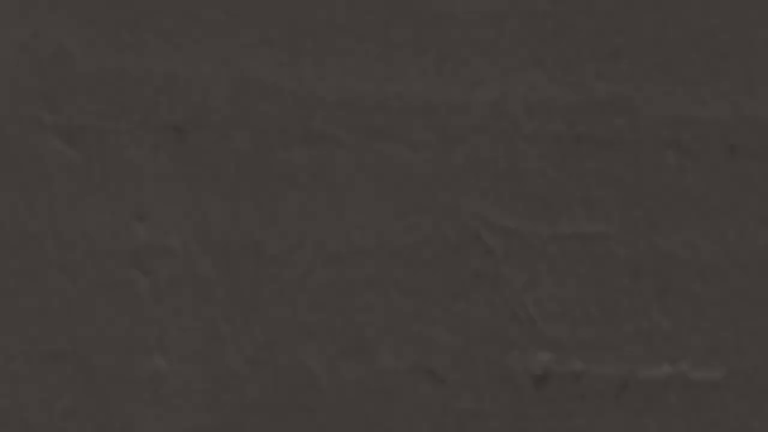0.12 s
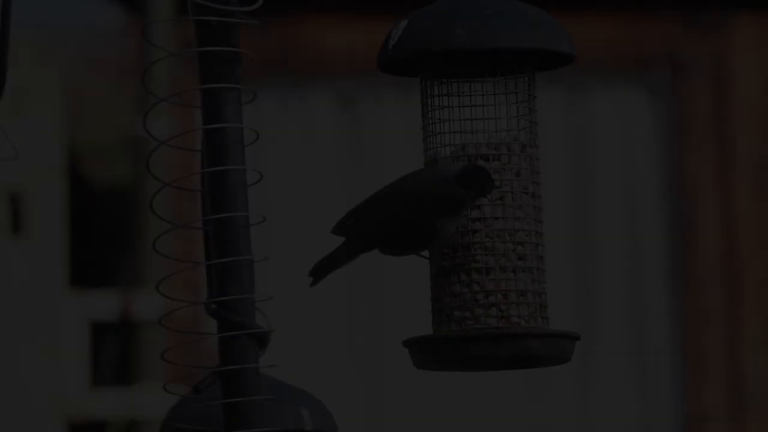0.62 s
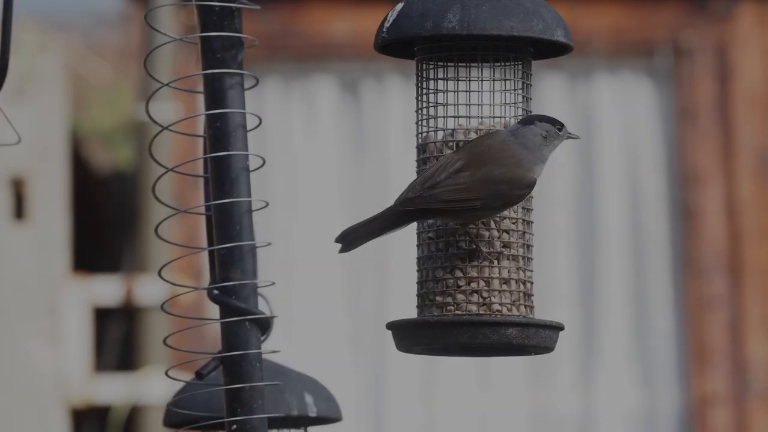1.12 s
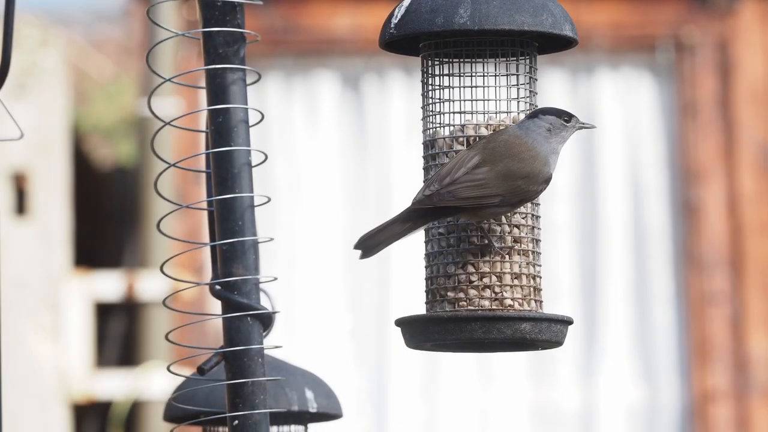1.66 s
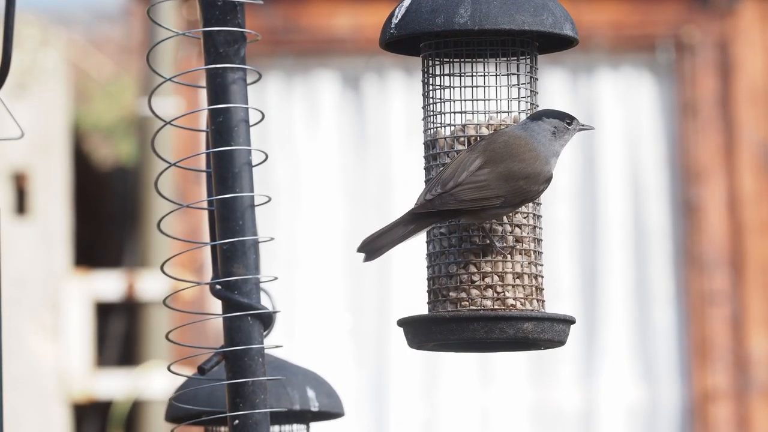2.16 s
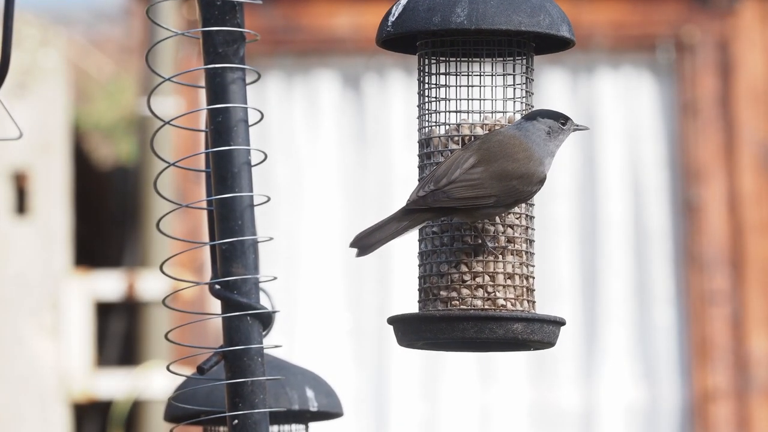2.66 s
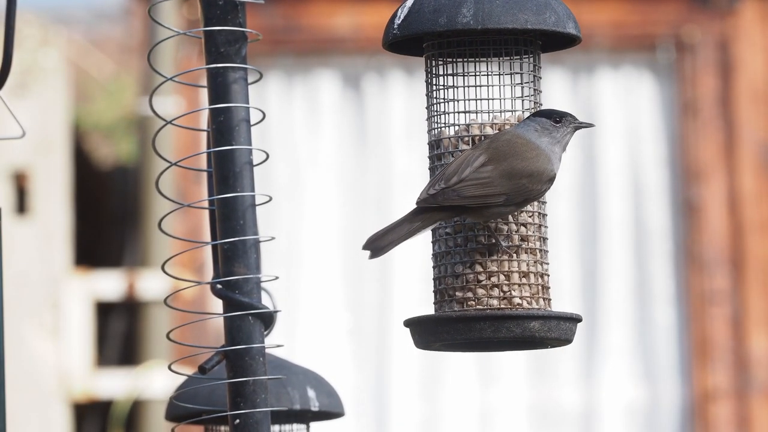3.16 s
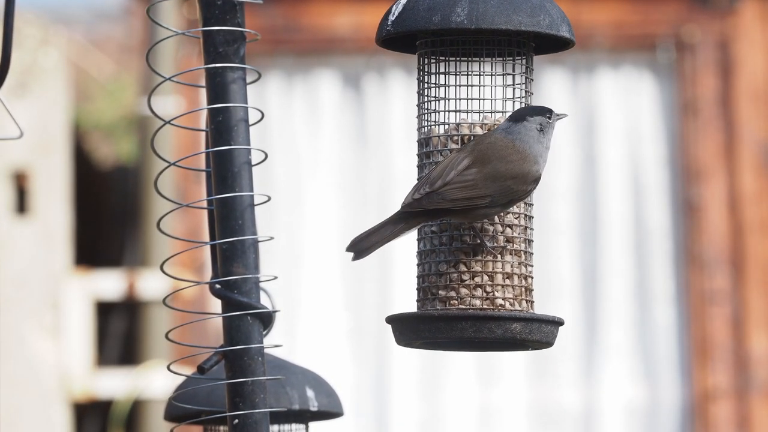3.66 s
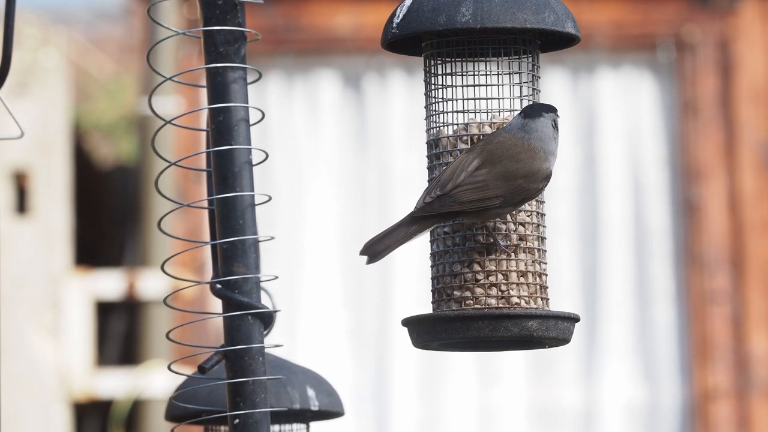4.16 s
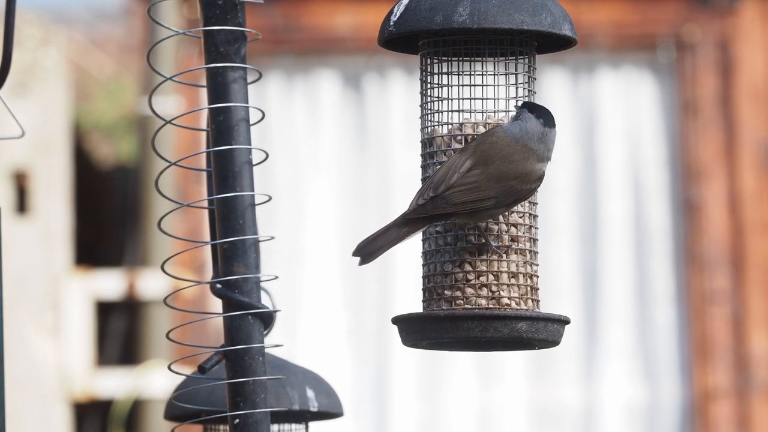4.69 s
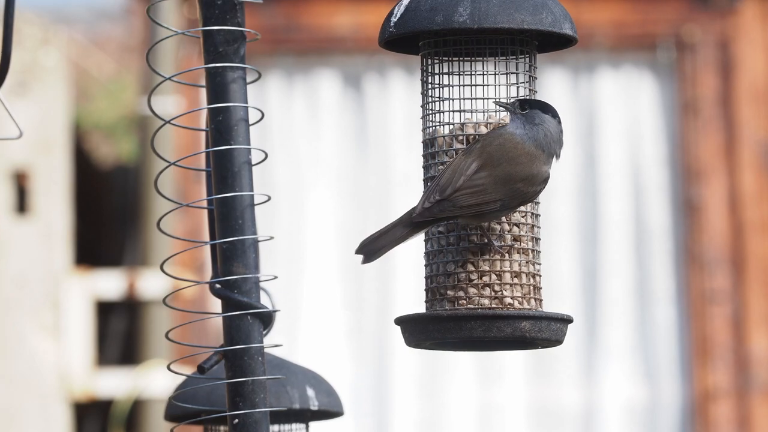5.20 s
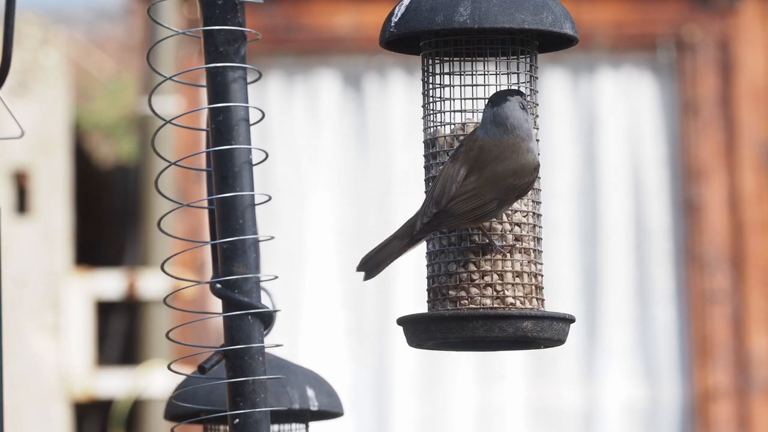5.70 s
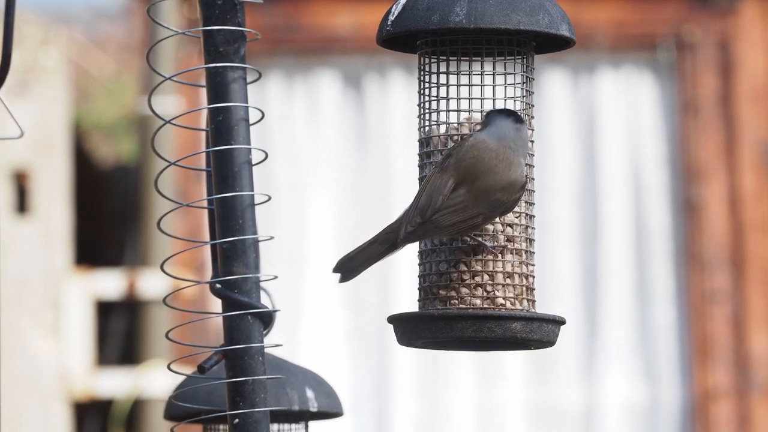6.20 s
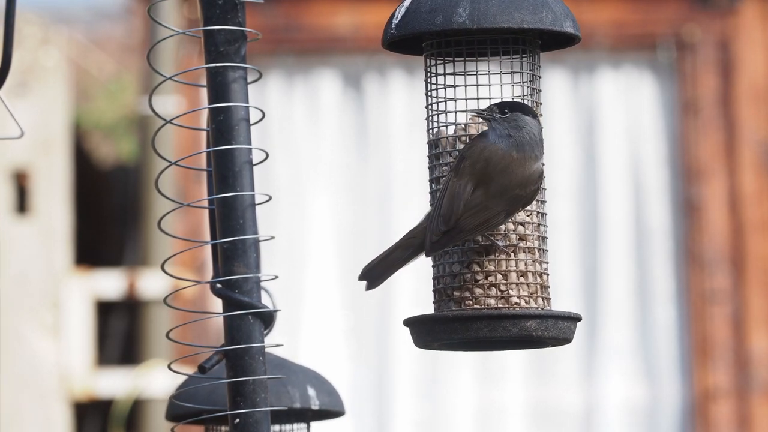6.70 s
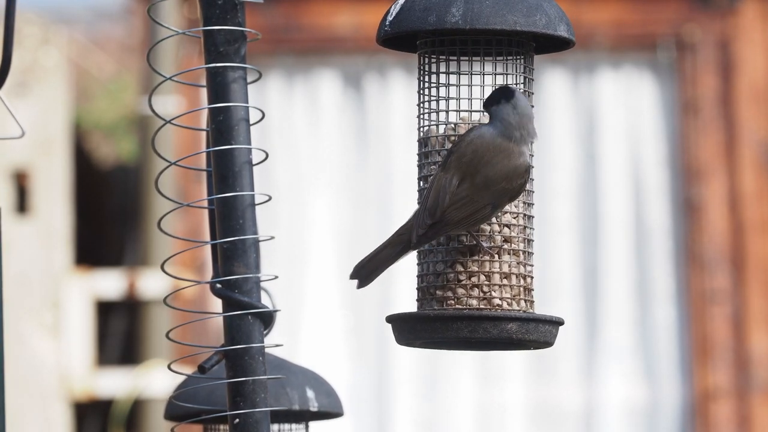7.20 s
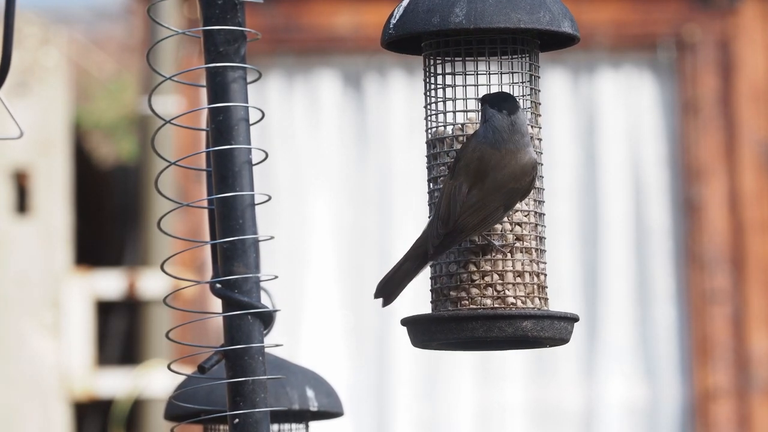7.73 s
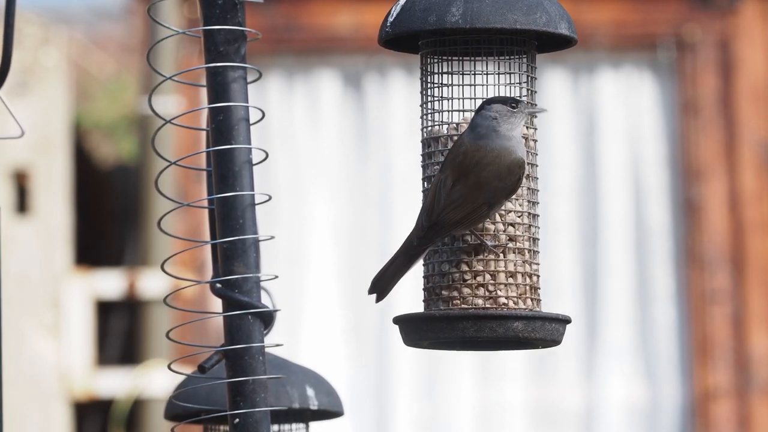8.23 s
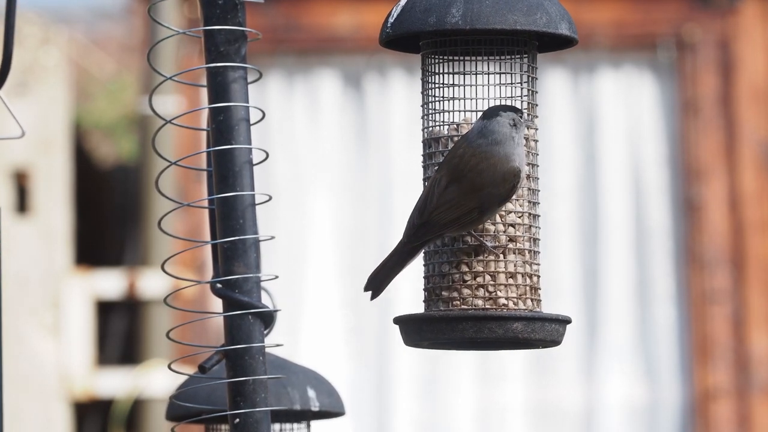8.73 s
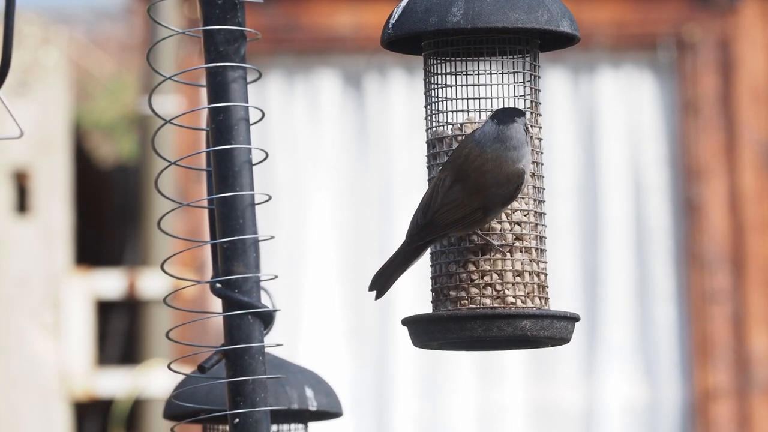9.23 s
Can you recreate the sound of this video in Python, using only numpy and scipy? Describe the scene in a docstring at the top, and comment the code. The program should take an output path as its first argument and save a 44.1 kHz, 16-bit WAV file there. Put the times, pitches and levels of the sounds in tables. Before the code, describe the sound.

A small warbler sings close to the microphone in a garden. A quick phrase of chirps, scratches, thin high notes and sliding whistles lasts about two and a half seconds, then stops. Distant birds twitter faintly over a low, dull traffic hum. Thin high notes begin a second, longer phrase, which grows into loud, fluty whistles and continues to the end. Short outdoor echoes trail each note.

```python
"""A warbler sings two fast phrases close to a microphone in a garden. Each side of its voice box
whistles a near-sine that glides, flicks or trills; fluttering membranes make harsh noisy rasps.
Walls and trees throw the song back as sparse echoes. Other birds whistle and twitter farther off,
over a dull traffic hum of shaped noise; a noise gate lowers everything while the singer is silent.
Table levels are source levels, ahead of echoes, filtering, channel balance and gate."""
import sys
import numpy as np
from scipy import signal
from scipy.fft import rfft, irfft
from scipy.io import wavfile
from scipy.ndimage import uniform_filter1d

SR = 44100
rng = np.random.default_rng(int(sys.argv[2]) if len(sys.argv) > 2 else 0)


def waveform_to_disk(signal):
    """Save audio, clipped to [-1, 1], as 16-bit WAV at the path in sys.argv[1]."""
    frames = np.transpose(np.atleast_2d(signal))
    scaled = np.clip(frames, -1, 1) * 32767
    samples = np.round(scaled).astype(np.int16)
    wavfile.write(sys.argv[1], SR, samples)


def gain_from_db(level_db):
    """Turn a decibel level (scalar or array-like) into a linear amplitude factor."""
    decades = np.asarray(level_db, float) / 20
    return 10 ** decades


N = 412776  # samples


def evened(x):
    """Scales to rms 1."""
    return x / np.sqrt(np.mean(x ** 2) + 1e-20)


def read(points, hz):
    """Reads a spectrum table on a log-frequency axis."""
    f, value = np.transpose(points)
    return np.interp(np.log(hz + 1), np.log(f + 1), value)


def add(mix, s, sound):
    """Mixes a sound in at s seconds."""
    part = mix[round(s * SR):][:len(sound)]
    part += sound[:len(part)]


def waver(count, span_s):
    """Random drift of rms 1: noise smoothed twice over span_s."""
    size = max(round(span_s * SR), 1)
    smooth = uniform_filter1d(rng.standard_normal(count), size)
    return evened(uniform_filter1d(smooth, size))


# spectrum shape of traffic and air: (f/Hz, relative level/dB)
HUM_SPECTRUM = [(150, -43), (230, -17.5), (450, -13), (900, 1.5), (1200, -8), (1500, -14.5), (2200, -21.5),
                (3000, -26), (4500, -25), (6500, -30), (8500, -49.5), (15000, -43)]


def hum():
    """Far traffic and air: shaped noise with faint drifting patches."""
    frames, hz = N // 256 + 5, np.fft.rfftfreq(1024, 1 / SR)
    # each of the three: frequency down, time across
    real, imaginary, patches = rng.standard_normal((frames, 513, 3)).T
    patches = uniform_filter1d(patches, 10, 0)
    patches = evened(uniform_filter1d(patches, 20, 1))
    shape_db = read(HUM_SPECTRUM, hz)[:, None] + 1.3 * patches
    spectrum = (real + 1j * imaginary) * gain_from_db(shape_db)
    noise = signal.istft(spectrum, nperseg=1024, noverlap=768)[1][:N]
    return gain_from_db(-60.5) * evened(noise)


# pitch range of the twitter: (lowest f/Hz, highest f/Hz)
CHATTER_HZ = (3200, 5600)
# length range of its slurs: (shortest/s, longest/s)
CHATTER_S = (.01, .04)


def chatter():
    """Rows for the faint random twitter of the farthest birds: mostly short falling slurs."""
    count = 320
    at, pitch, fall, span, size = rng.random((count, 5)).T
    low_hz, high_hz = CHATTER_HZ
    start_hz = low_hz * (high_hz / low_hz) ** pitch
    end_hz = start_hz * (1 - .3 * fall ** 2)
    length = np.interp(span, [0, 1], CHATTER_S)
    level_db = -74 - 2 * np.log(size + .02)  # a few calls stand out
    return np.transpose([at * N / SR, length, start_hz, end_hz, level_db])


# calls of other birds: (t/s, length/s, start f/Hz, end f/Hz, level/dB)
FAR_CALLS = [(0.686, 0.23, 2319, 2390, -60.5), (1.605, .03, 7300, 6600, -53.5),
             (1.635, 0.045, 6550, 6600, -52), (2.083, 0.09, 6810, 6420, -53.5),
             (2.339, 0.22, 1974, 1732, -56), (2.618, 0.026, 4600, 3370, -47.5),
             (2.69, 0.11, 2310, 2320, -52), (2.81, .25, 2330, 2362, -57), (2.694, 0.016, 3400, 4360, -51),
             (2.704, 0.082, 1830, 1807, -62), (2.705, 0.016, 3340, 4400, -44.5),
             (2.734, 0.02, 3900, 3850, -47.5), (2.794, 0.021, 5200, 4250, -58),
             (2.877, 0.021, 4900, 3610, -54), (2.913, 0.085, 7750, 7670, -67.5),
             (2.91, 0.2, 2473, 2411, -60), (2.953, 0.0081, 4900, 3600, -53),
             (3.01, 0.016, 4820, 4670, -60.5), (3.132, 0.026, 4340, 4345, -65),
             (3.137, 0.011, 4520, 3840, -54.5), (3.219, 0.015, 3610, 3440, -52),
             (3.273, 0.19, 1664, 1816, -63), (3.28, .2, 3570, 3310, -66), (4.12, .018, 6800, 4860, -67),
             (4.545, .035, 4130, 2900, -63), (3.409, 0.034, 4710, 4990, -66),
             (3.455, 0.034, 6080, 5240, -72), (3.533, 0.065, 6180, 5050, -61.5),
             (3.553, 0.21, 2034, 2180, -62), (3.6, 0.095, 4630, 5120, -70), (3.593, 0.083, 3610, 3820, -68),
             (3.676, 0.063, 6600, 5066, -60.5), (3.752, 0.016, 5520, 3680, -69),
             (3.755, 0.097, 3740, 3880, -62), (3.812, 0.079, 6500, 4530, -61),
             (3.922, 0.13, 3904, 3955, -60), (3.944, 0.05, 6470, 4840, -60),
             (3.955, 0.12, 2388, 2388, -53.5), (4.033, 0.09, 3150, 3150, -72.5),
             (4.057, 0.45, 2503, 2414, -68), (4.118, 0.063, 4876, 4750, -55),
             (4.286, 0.053, 4750, 3480, -64), (4.39, 0.094, 7380, 6270, -66.5),
             (4.48, 0.025, 6350, 3800, -65.5), (4.489, 0.053, 3643, 3545, -52.5),
             (4.595, 0.018, 4860, 4390, -58.5), (4.644, 0.3, 2102, 2130, -65),
             (4.73, 0.04, 3450, 2910, -51.5), (4.739, 0.098, 7000, 6360, -56),
             (4.777, 0.043, 3140, 3190, -44), (4.85, 0.016, 5600, 4840, -54),
             (4.868, 0.05, 4790, 4710, -48.5), (5.011, 0.058, 4730, 4430, -51),
             (5.595, 0.022, 6270, 5100, -48), (5.62, 0.03, 3600, 3050, -46.5),
             (6.07, 0.13, 1850, 2020, -60.5), (6.11, 0.14, 6520, 6460, -68.5),
             (6.2, 0.042, 1956, 1970, -64), (7.72, .06, 2700, 2500, -52), (7.78, 0.085, 2250, 2500, -50),
             (7.912, .045, 6900, 6800, -48), (7.955, .04, 6700, 5200, -48),
             (8.087, 0.033, 4770, 5440, -32.5), (8.188, 0.088, 5170, 3920, -37.5),
             (8.321, 0.04, 4950, 5430, -34.5), (8.545, 0.22, 7090, 6740, -41),
             (8.893, 0.084, 7500, 6240, -45.5), (8.885, 0.12, 7400, 7920, -48),
             (9.047, 0.06, 7970, 7470, -45.5), (9.06, 0.11, 6850, 6610, -48.5),
             (9.197, 0.14, 8000, 7070, -49.5), (9.219, 0.079, 2270, 2074, -51.5),
             (9.231, 0.08, 7000, 6300, -50.5)]
# one hoarse distant call: (t/s, length/s, centre f/Hz, width f/Hz, rms level/dB)
FAR_RASP = (4.885, .08, 3650, 400, -49)


def others():
    """Distant whistles that glide quickly at first, blurred by moving air, and one hoarse call."""
    mix = np.zeros(N)
    for s, length, start_hz, end_hz, db in [*FAR_CALLS, *chatter()]:
        u = np.linspace(0, 1, round(length * SR))
        pitch = start_hz + (end_hz - start_hz) * u ** 0.88
        blur = .002 + .02 * (start_hz / 7500) ** 4  # high calls arrive buzzier
        pitch *= 1 + blur * waver(len(u), .002)
        flutter = gain_from_db(2.2 * waver(len(u), .006))
        level = gain_from_db(db) * flutter * signal.windows.tukey(len(u), .38)
        add(mix, s, level * np.sin(2 * np.pi * np.cumsum(pitch) / SR))
    s, *note = FAR_RASP
    add(mix, s, rasp(*note))
    return mix


# echo decay time by band: (f/Hz, t60/s)
GARDEN_DECAY = [(2000, 0.55), (4500, 0.54), (9000, 0.56)]


def garden(x, start_s, early_db):
    """Sparse echoes of random sign; a loud first burst from near walls, then a tail by band."""
    at = np.arange(round(start_s * SR), SR - 20, 20)
    taps = np.zeros(SR)
    taps[at + rng.integers(0, 20, len(at))] = rng.choice([-1., 1.], len(at))
    taps *= 1 + gain_from_db(early_db) * np.exp(-np.arange(SR) / SR / 0.0074)
    hz, t, z = signal.stft(taps, SR, nperseg=256)
    decay_db = -60 * t / read(GARDEN_DECAY, hz)[:, None]
    tail = signal.istft(z * gain_from_db(decay_db), SR, nperseg=256)[1]
    return signal.fftconvolve(x, tail / np.linalg.norm(tail))[:N]


def rasp(length, centre_hz, width_hz, db, taper=.7, fade_db=0):
    """Irregular membrane flutter: bursts of noise in the windpipe resonance, with a thin high skirt."""
    count = round(length * SR)
    hz = np.fft.rfftfreq(count, 1 / SR)
    pipe = 1 / (1 + (2 * (hz - centre_hz) / width_hz) ** 4)
    pipe += gain_from_db(-27.0 - 1.5 * hz / 1000) * (hz > centre_hz)  # the skirt
    noise = irfft(rfft(rng.standard_normal(count)) * pipe, count)
    buzz = evened(noise * gain_from_db(3.1 * waver(count, 0.00057)))
    fade = gain_from_db(np.linspace(0, fade_db, count))
    return gain_from_db(db) * buzz * signal.windows.tukey(count, taper) * fade


# harsh notes, and high hiss over chirps, buzz and duets: (t/s, length/s, centre f/Hz, width f/Hz, rms level/dB)
RASPS = [(0.25, 0.025, 5100, 4140, -34.5), (0.638, 0.015, 5700, 3620, -28),
         (0.318, 0.039, 5800, 4100, -38.5), (2.843, 0.018, 4430, 3030, -44.5),
         (.903, .028, 8500, 9000, -38.5), (.986, .028, 8500, 9000, -38), (5.362, .13, 11500, 6000, -49),
         (5.655, .072, 11500, 6000, -49), (5.795, .078, 11500, 6000, -49), (6.483, 0.066, 4050, 865, -19)]
# rasps that start hard and die away: (t/s, length/s, centre f/Hz, width f/Hz, starting rms level/dB)
SCRATCHES = [(1.119, .034, 4100, 2200, -28), (1.154, .034, 4700, 2200, -22), (1.191, .04, 4600, 2500, -21)]


def rasps():
    """Harsh notes and fading scratches from membrane flutter, and bands of high hiss over the chirps, buzz and
    duets."""
    harsh = [(s, rasp(*note)) for s, *note in RASPS]
    return harsh + [(s, rasp(*note, taper=.25, fade_db=-12)) for s, *note in SCRATCHES]


def whistle(rows, overtone_db, trill_rate=1, trill_hz=0, edge_s=.003):
    """A near-sine from one syrinx membrane, with weak second and third partials."""
    s, hz, db = np.transpose(rows)
    t = np.arange(s[0] - edge_s, s[-1] + edge_s, 1 / SR)
    trill = trill_hz * np.sin(2 * np.pi * trill_rate * (t - t[0]))
    pitch = uniform_filter1d(np.interp(t, s, hz), 40) + trill + 18 * waver(len(t), 0.0014)
    turn = 2 * np.pi * np.cumsum(pitch) / SR
    level_db = np.interp(t, s, db)
    heard = np.clip((16000 - 3 * pitch) / 1000, 0, 1)  # no third partial above 16 kHz
    third_db = min(overtone_db, -40.) + 0.8 * (level_db + 2.0)  # grows with effort
    third = gain_from_db(third_db) * heard * np.sin(3 * turn)
    tone = np.sin(turn) + gain_from_db(overtone_db) * np.sin(2 * turn) + third
    edges = np.clip(np.minimum(t - t[0], t[-1] - t) / (1.1 * edge_s), 0, 1) ** 2
    return t[0], gain_from_db(level_db + 1.2 * waver(len(t), 0.0039)) * edges * tone


# second partial against the fundamental: (fundamental f/Hz, relative level/dB)
OVERTONE = [(1900, -14.5), (2300, -16), (2470, -33), (3200, -45), (4500, -35.5), (6000, -35.5), (8000, -56)]


def voiced(rows, trill_rate=1, trill_hz=0):
    """One whistled note whose second partial depends on its mean pitch."""
    mean_hz = np.mean(rows, 0)[1]
    return whistle(rows, read(OVERTONE, mean_hz), trill_rate, trill_hz)


# trilled glides: (trill rate/Hz, trill depth f/Hz, [(t/s, f/Hz, level/dB), ..])
TRILLS = [(148.8, 150, [(2.17, 1900, -47), (2.19, 3266, -29.5), (2.215, 3634, -13), (2.258, 3853, -19)]),
          (148.5, 270, [(5.985, 2927, -28), (6.03, 3910, -25.5), (6.05, 5100, -13.5),
          (6.074, 5810, -28.5)]), (139.5, 86, [(9.277, 3145, -20.5), (9.31, 3340, -11.5),
          (9.335, 3767, -13.5), (9.359, 2964, -9)]), (123, 230, [(1.754, 6350, -46), (1.762, 7200, -30),
          (1.8, 5016, -18), (1.83, 4640, -24.5), (1.85, 5100, -32)]), (40, 30, [(.122, 1900, -42.5),
          (.159, 1810, -41), (.178, 1760, -58)]), (36, 80, [(6.392, 1854, -36.5), (6.425, 1870, -38),
          (6.445, 1740, -46)]), (44, -200, [(8.13, 3446, -17), (8.15, 3450, -13), (8.19, 3470, -13.5),
          (8.2, 3600, -13), (8.219, 3350, -18)]), (49.5, 165, [(8.773, 2317, -29.5), (8.79, 2400, -20),
          (8.836, 2500, -17), (8.846, 2440, -30)])]


def trills():
    """Glides whose pitch swings in a fast sine."""
    return [voiced(rows, rate, depth_hz) for rate, depth_hz, rows in TRILLS]


# double arches of both voices: (t/s, low top f/Hz, high top f/Hz, level/dB)
DUETS = [(5.655, 3486, 7920, -17.5), (5.797, 3200, 7850, -18)]
# shape of the arches: (t/s, low f/share of its first top, high f/share of its first top, level/dB)
DUET_SHAPE = [(0, .92, .86, -20), (.004, .98, .985, -6), (.009, 1, 0.98, 0), (.017, .95, .94, -5),
              (.028, .87, .79, -10), (.035, .88, .77, -14), (.047, 1.11, 1.08, -2), (.064, .93, .88, -5),
              (.073, .84, .83, -15)]
# partials of the pair: (multiple of low f, multiple of high f)
DUET_TONES = [(1, 0), (2, 0), (3, 0), (0, 1), (-1, 1), (1, 1), (2, 1), (-1, 2)]
# their balance, one per partial: [level/dB]
DUET_TONES_DB = [-11.5, -9, -25.5, 0, -14.5, -20.5, -30, -30]


def duets():
    """Two voices at once, heard with their multiples, sums and differences."""
    notes = []
    for s, low, high, db in DUETS:
        for (m, n), tone_db in zip(DUET_TONES, DUET_TONES_DB):
            rows = [(s + at, m * a * low + n * b * high, db + more + tone_db)
                    for at, a, b, more in DUET_SHAPE]
            notes.append(whistle(rows, -62))
    return notes


# course of one held buzz: (t/s, fundamental f/Hz, level/dB)
BUZZ = [(5.364, 1213, -34.5), (5.378, 1327, -27), (5.41, 1382, -26.5), (5.46, 1349, -26.5),
        (5.49, 1213, -34.5)]
# its partials: [multiple of the fundamental]
BUZZ_TONES = [2, 3, 4, 6, 7, 8, 10]
# their balance, one per partial: [level/dB]
BUZZ_TONES_DB = [-11, -12, 0, -10, -30, -28, -32]
# pulse swing either way, one per partial: [level/dB]
BUZZ_PULSE_DB = [1, 7, 1, 2, 7, 4, 4]


def held_buzz():
    """A stack of partials whose levels pulse together 52 times a second."""
    notes = []
    for k, tone_db, pulse_db in zip(BUZZ_TONES, BUZZ_TONES_DB, BUZZ_PULSE_DB):
        s, tone = whistle([(s, k * hz, db + tone_db) for s, hz, db in BUZZ], -61)
        pulse = np.sin(2 * np.pi * 52 * np.arange(len(tone)) / SR)
        notes.append((s, tone * gain_from_db(pulse_db * pulse)))
    return notes


# one rolled syllable sung twice: (t/s, level/dB)
ROLLS = [(6.882, -20), (7.065, -19.5)]
# its course: (t/s, fundamental f/Hz, level/dB)
ROLL_SHAPE = [(0, 985, -6.5), (0.011, 1088, 1), (.038, 1050, 0.5), (.058, 890, -1), (.07, 723, -19)]
# its partials: [multiple of the fundamental]
ROLL_TONES = [2, 3, 4]
# their balance, one per partial: [level/dB]
ROLL_TONES_DB = [-21, 0, -15]
# trill depth, one per partial: [f/Hz]
ROLL_DEPTH_HZ = [20, 215, 30]


def rolls():
    """A strong third partial with its two neighbours, trilled 121 times a second."""
    notes = []
    for s, db in ROLLS:
        for k, tone_db, depth_hz in zip(ROLL_TONES, ROLL_TONES_DB, ROLL_DEPTH_HZ):
            rows = [(s + at, k * hz, db + more + tone_db) for at, hz, more in ROLL_SHAPE]
            notes.append(whistle(rows, -35, 121, depth_hz))
    return notes


# quick upward flicks over the held buzz: (t/s, top f/Hz, level/dB)
FLICKS = [(5.372, 6900, -21.5), (5.385, 7300, -26.5), (5.399, 7450, -21), (5.416, 7300, -22.5),
          (5.436, 7620, -22.5), (5.457, 7500, -22), (5.477, 7350, -27)]
# shape of a flick: (t/s, f/Hz from the top, level/dB)
FLICK_SHAPE = [(0, -900, -7.5), (.004, -500, -1), (.008, 1.5, -2.5), (.013, -600, -7.5)]


def flicks():
    """Courses of the other voice flicking up over the buzz."""
    return [[(s + at, top + hz, db + more) for at, hz, more in FLICK_SHAPE] for s, top, db in FLICKS]


# a sharp chirp sung twice: (t/s, level/dB)
CHIRPS = [(.885, -17.5), (.967, -16)]
# course of each of the two voices: [(t/s, f/Hz, level/dB), ..]
CHIRP_VOICES = [
    [(0, 3734, -18), (.01, 4746, -9.5), (.018, 4927, -4.5), (.024, 6570, -12.5), (.03, 5890, -2.5),
     (.038, 5785, 0), (.047, 5760, -12)],
    [(.002, 2235, -33), (.016, 2450, -22), (.024, 4720, -2), (.03, 3510, -11.5), (.037, 2826, -17)],
]


def chirps():
    """Courses of both voices snapping upwards together."""
    return [[(s + at, hz, db + more) for at, hz, more in voice]
            for s, db in CHIRPS for voice in CHIRP_VOICES]


# drops that spring back and drop again: (t/s, top f/Hz, bottom f/Hz, level/dB)
ZIGZAGS = [(1.943, 4800, 2970, -14), (1.992, 4560, 3000, -11.5), (2.049, 4510, 2916, -15.5),
           (2.339, 4410, 3230, -20), (2.345, 4375, 2774, -22.5)]
# shape of a zigzag: (t/s, f/share of the drop above the bottom, level/dB)
ZIGZAG_SHAPE = [(0, 0.92, -16), (.006, 0, -0.5), (.011, .8, -11.5), (0.019, -.2, -12.5)]


def zigzags():
    """Courses that drop, spring back and drop again."""
    return [[(s + at, low + share * (top - low), db + more) for at, share, more in ZIGZAG_SHAPE]
            for s, top, low, db in ZIGZAGS]


def glide(bend, s, length, start_hz, end_hz, db):
    """Pitch bends from start to end; the level swells and drops."""
    u = np.linspace(0, 1, num=11)
    level_db = db + np.interp(u, [0, .55, 1], [-12.5, 0, -6.5])
    pitch = end_hz + (start_hz - end_hz) * (1 - u) ** bend
    return np.transpose([s + length * u, pitch, level_db])


# glides that slow down towards their end: (t/s, length/s, start f/Hz, end f/Hz, level/dB)
GLIDES = [(0.244, 0.023, 7920, 8440, -31), (.255, 0.0059, 9380, 7670, -30), (.254, .012, 6900, 2000, -27),
          (.323, .012, 6400, 2100, -27), (7.314, .017, 3800, 2700, -17), (0.316, 0.021, 8700, 8100, -32.5),
          (0.327, 0.0093, 5240, 3654, -29), (.5, 0.03, 4830, 8830, -40), (1.12, 0.015, 2280, 4674, -24),
          (1.859, .035, 5990, 6500, -28), (1.929, 0.015, 3974, 4086, -19),
          (1.969, 0.019, 5320, 4350, -22.5), (2.028, 0.016, 5183, 4250, -25.5),
          (2.323, 0.015, 4936, 4830, -19.5), (2.437, 0.025, 4330, 3425, -23),
          (2.54, 0.031, 4920, 4520, -42), (5.195, .018, 4620, 2800, -19), (5.264, 0.021, 4050, 2776, -19.5),
          (5.936, 0.012, 4316, 2800, -18.5), (5.957, .015, 4020, 2900, -16), (5.978, .01, 4164, 2860, -15),
          (6.633, 0.024, 2260, 4300, -21), (6.615, .012, 5600, 5370, -21.5),
          (7.018, 0.0096, 5495, 5300, -23), (7.393, 0.015, 2654, 2866, -11.5),
          (7.562, 0.031, 1760, 2150, -28), (7.778, .013, 6620, 5900, -21), (7.873, 0.032, 3145, 3860, -35),
          (7.956, 0.037, 4840, 4010, -37.5), (8.665, 0.024, 2484, 1840, -25.5),
          (8.97, 0.023, 4200, 4780, -21), (8.973, 0.016, 4960, 5780, -29), (9.053, 0.021, 3410, 2980, -14)]
# plunges fall steeply and level out: (t/s, length/s, start f/Hz, end f/Hz, level/dB)
PLUNGES = [(7.702, .034, 7700, 4420, -14), (7.773, .038, 7500, 4575, -12.5)]
# dives start slowly and steepen: (t/s, length/s, start f/Hz, end f/Hz, level/dB)
DIVES = [(6.595, .024, 6390, 3400, -14.5), (7.003, .021, 6200, 2800, -16.5),
         (6.655, .014, 4300, 2600, -21.5)]


def glides():
    """Courses of all bent glides; a bend above 1 moves fastest at first, below 1 at the end."""
    families = [(1.5, GLIDES), (3.4, PLUNGES), (.42, DIVES)]
    return [glide(bend, *row) for bend, rows in families for row in rows]


def hook(s, length, top_hz, end_hz, db):
    """Up to the top, then loudest midway down the fall."""
    top_s, end_s = s + .3 * length, s + length
    return [(s, .78 * top_hz, db - 9), (top_s, top_hz, db - 4.5),
            ((top_s + end_s) / 2, (top_hz + end_hz) / 2, db), (end_s, end_hz, db - 9.5)]


# flicks up to a top that fall away: (t/s, length/s, top f/Hz, end f/Hz, level/dB)
HOOKS = [(.005, 0.0082, 2620, 2390, -36), (.023, 0.015, 2750, 2220, -37), (0.042, 0.016, 2250, 2050, -35.5),
         (0.064, 0.031, 2280, 1976, -35.5), (0.097, 0.025, 2090, 1870, -35.5),
         (1.12, 0.013, 4940, 3350, -21), (2.428, 0.0092, 3400, 2347, -17), (5.062, .012, 8800, 7360, -30.5),
         (5.147, 0.013, 3980, 2980, -26.5), (5.21, .019, 4110, 2580, -21),
         (5.278, 0.019, 4435, 2685, -20.5), (7.26, 0.025, 4180, 3830, -23), (8.428, .02, 4940, 3200, -11),
         (8.49, .021, 4760, 3330, -9.5), (9.041, 0.014, 3750, 3360, -15.5)]


def hooks():
    """Courses of all hooks."""
    return [hook(*row) for row in HOOKS]


def seep(s, length, top_hz, db, leap_db):
    """A leap that overshoots, settles and sags."""
    leap_hz, rise_s, sag_hz_per_s = 1800, 0.0041, 14000
    held_hz, held_s = top_hz - 348, min(2 * rise_s, (rise_s + length) / 2)
    end_hz = held_hz - sag_hz_per_s * (length - held_s)
    return [(s, top_hz - leap_hz, leap_db - 6),
            (s + rise_s / 2, top_hz - leap_hz / 2, leap_db),
            (s + rise_s, top_hz, (leap_db + db) / 2),
            (s + held_s, held_hz, db),
            (s + length, end_hz, db - 4)]


# high sibilant notes: (t/s, length/s, top f/Hz, held level/dB, leap level/dB)
SEEPS = [(1.373, 0.026, 8800, -35, -27.5), (1.407, .029, 8560, -30, -20), (1.445, 0.039, 8835, -27.5, -21),
         (1.485, 0.045, 8795, -24, -24.5), (1.533, .027, 8640, -23.5, -36), (1.568, 0.012, 8420, -24, -32),
         (4.646, 0.015, 8590, -33, -36), (4.677, 0.025, 9015, -33.5, -35), (4.712, 0.029, 8960, -26, -30),
         (4.752, 0.026, 9220, -24.5, -28), (4.792, 0.039, 9020, -24, -27),
         (4.835, .032, 8840, -25.5, -28.5), (4.93, .026, 8810, -23, -28), (4.966, .031, 8934, -25, -26),
         (5.005, .009, 8704, -30.5, -34)]


def seeps():
    """Courses of all sibilant notes."""
    return [seep(*row) for row in SEEPS]


# long whistles of either voice: [(t/s, f/Hz, level/dB), ..]
WHISTLES = [
    [(.403, 3070, -38), (.434, 4626, -24.5), (.458, 4850, -28.5)],
    [(.413, 2356, -44), (.448, 3815, -22.5), (.462, 4097, -30)],
    [(.542, 8200, -44.5), (.554, 7550, -35.5), (.575, 7535, -29.5), (.6, 7490, -33), (.64, 7660, -31)],
    [(.566, 4600, -44), (.586, 4070, -37), (.64, 4192, -29), (.652, 2520, -45.5)],
    [(1.757, 3668, -40), (1.79, 2930, -40.5), (1.832, 2210, -47), (1.86, 3000, -40), (1.885, 3330, -40)],
    [(1.851, 5024, -23.5), (1.87, 5320, -20), (1.891, 5450, -22.5), (1.903, 4930, -24.5)],
    [(2.538, 4500, -47.5), (2.547, 6050, -31.5), (2.557, 5975, -17.5), (2.566, 6370, -21.5),
     (2.577, 6120, -36.5)],
    [(2.578, 4403, -29), (2.584, 5844, -18.5), (2.592, 6650, -16), (2.599, 6530, -30.5), (2.607, 6506, -15)],
    [(5.06, 6720, -41), (5.07, 6540, -32), (5.097, 6086, -21.5), (5.104, 5110, -17.5), (5.114, 5670, -27),
     (5.138, 2744, -24.5)],
    [(6.254, 2350, -28), (6.259, 3560, -33.5), (6.265, 2476, -24), (6.276, 2277, -25.5),
     (6.34, 2195, -24.5)],
    [(7.267, 2930, -39), (7.276, 3390, -14.5), (7.295, 3200, -11), (7.312, 2950, -17.5)],
    [(7.336, 3190, -14.5), (7.351, 3860, -9.5), (7.362, 5340, -34.5)],
    [(7.48, 2600, -19), (7.511, 3302, -13.5), (7.545, 3556, -12), (7.555, 2073, -27), (7.562, 2883, -18)],
    [(7.866, 2123, -44.5), (7.872, 2370, -28.5), (7.908, 2460, -16.5), (7.914, 3080, -29),
     (7.921, 2586, -20), (7.932, 3460, -27), (7.951, 3240, -13), (7.986, 2530, -26.5)],
    [(8.075, 3634, -36.5), (8.081, 3758, -21.5), (8.113, 3670, -15), (8.127, 3754, -12.5)],
    [(8.3, 3108, -25.5), (8.309, 3628, -27), (8.341, 2398, -15.5), (8.385, 2400, -20.5),
     (8.41, 2408, -32.5)],
    [(8.548, 2910, -27.5), (8.556, 3267, -16), (8.574, 2877, -14), (8.602, 2481, -18.5), (8.616, 2617, -12),
     (8.633, 2800, -26.5)],
    [(8.974, 3420, -38), (8.988, 3482, -26), (9.003, 4690, -10), (9.029, 4497, -16)],
    [(9.108, 4026, -19.5), (9.12, 3955, -11.5), (9.168, 3488, -14.5)],
]


def strokes():
    """The (t/s, f/Hz, level/dB) course of every untrilled single-voiced stroke."""
    return WHISTLES + zigzags() + flicks() + chirps() + glides() + hooks() + seeps()


def singer():
    """All strokes, trills and rasps of the near bird, with air hissing past the membranes."""
    courses = strokes()
    notes = [voiced(rows) for rows in courses] + duets() + held_buzz() + rolls() + trills()
    mix, squares = np.zeros((2, N))
    for s, sound in notes:
        add(mix, s, sound)
        add(squares, s, sound ** 2)
    effort = uniform_filter1d(abs(mix), 60)
    # two voices in one windpipe make sum and difference tones
    mix += gain_from_db(-30.5) * (mix ** 2 - squares) / (effort + 1e-4)
    air_band = signal.butter(3, [2000, 6500], "bandpass", fs=SR, output="sos")
    air = signal.sosfilt(air_band, rng.standard_normal(N))
    mix += gain_from_db(-32.0) * effort * air
    for (s, hz, db), (next_s, next_hz, next_db), *_ in courses:
        if next_hz - hz > 200e3 * (next_s - s):  # a steep upward start snaps the membrane open
            add(mix, s, rasp(0.003, 8000, 16000, max(db, next_db) - 31.0))
    for s, sound in rasps():
        add(mix, s, sound)
    # a tiny body radiates no bass
    body = signal.butter(6, 1550, "highpass", fs=SR, output="sos")
    return signal.sosfilt(body, mix)


def scene():
    """One microphone, fed to two channels with the right a little louder."""
    near, far = singer(), others()
    near_echo = gain_from_db(-6.5) * garden(near, .003, 20.1)
    far_echo = gain_from_db(-1.0) * garden(far, 0.0057, 7.0)
    mono = near + near_echo + far + far_echo + hum()
    return mono * gain_from_db([[-.55], [.55]])


def band_limit(x):
    """A steep low-pass at the top of the band."""
    return signal.sosfilt(signal.butter(12, 15710, fs=SR, output="sos"), x)


def record(dry):
    """The gate opens within milliseconds on a loud note and sinks by up to 10.5 dB as sound dies away."""
    power = uniform_filter1d((dry ** 2).mean(0), 300)
    power_db = 10 * np.log10(abs(power) + 1e-12)
    fall = np.arange(N) * 220.0 / SR  # the detector falls 220 dB a second
    held_db = np.maximum.accumulate(power_db + fall) - fall
    gate_db = np.clip(0.4 * (held_db + 33.5), -10.5, 0)  # 0.4 dB of cut per dB below -33.5 dB
    mix = dry * gain_from_db(uniform_filter1d(gate_db, 400))
    return band_limit(mix)


dry = scene()
out = record(dry)
waveform_to_disk(out)
```